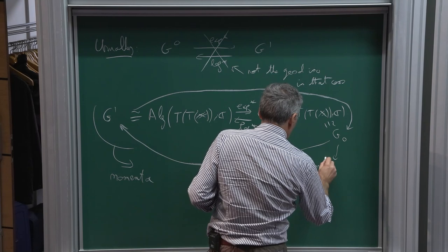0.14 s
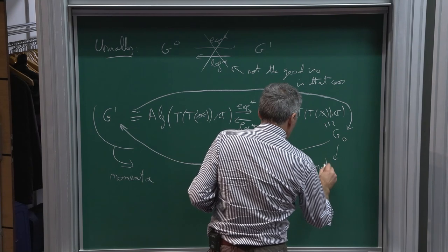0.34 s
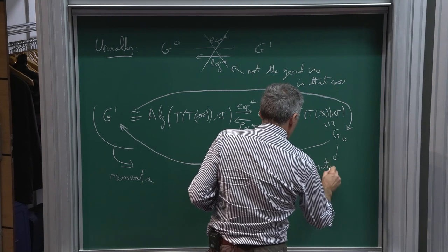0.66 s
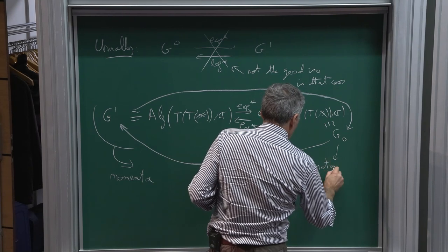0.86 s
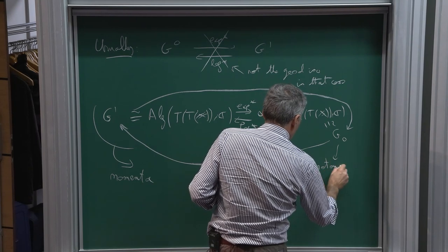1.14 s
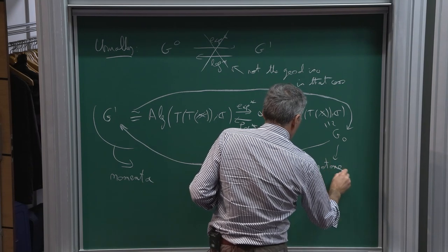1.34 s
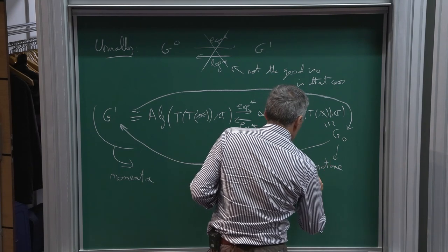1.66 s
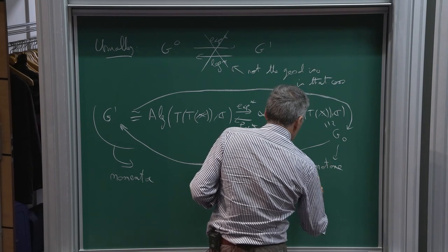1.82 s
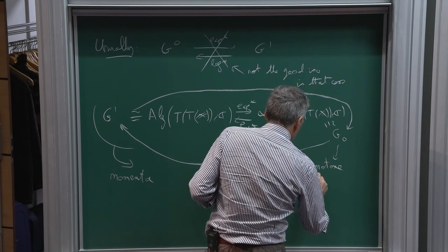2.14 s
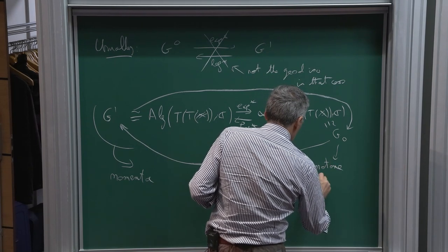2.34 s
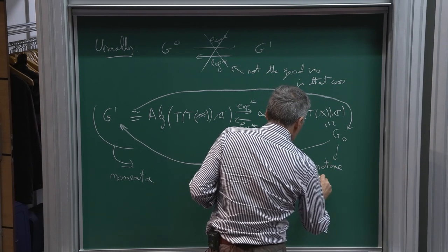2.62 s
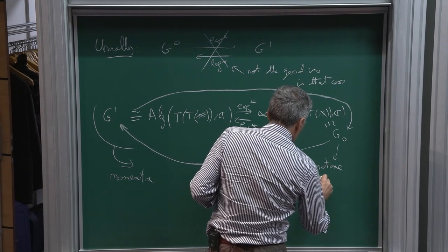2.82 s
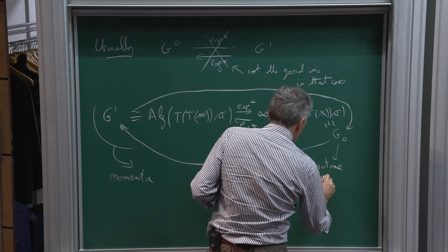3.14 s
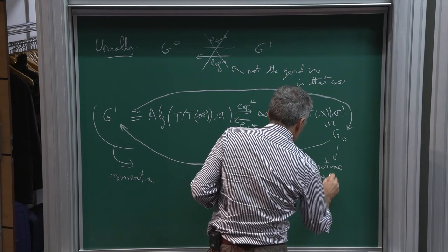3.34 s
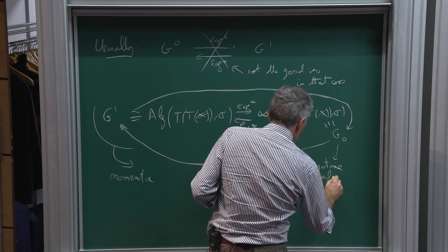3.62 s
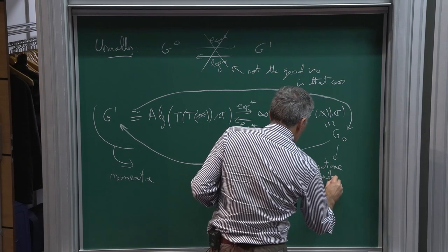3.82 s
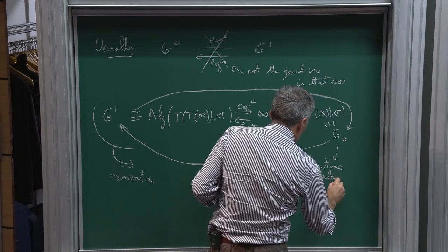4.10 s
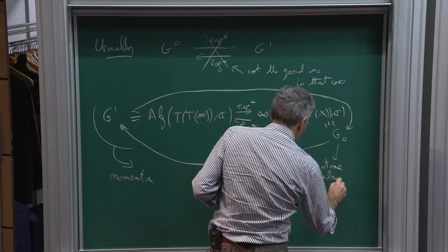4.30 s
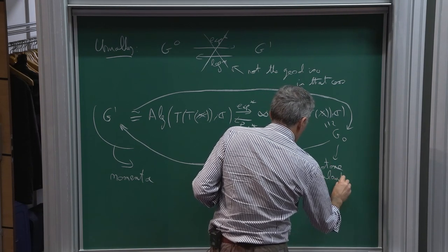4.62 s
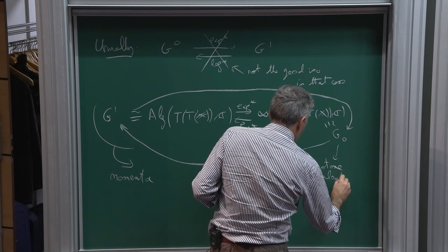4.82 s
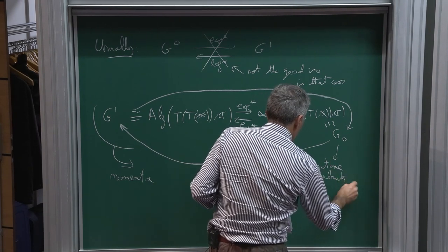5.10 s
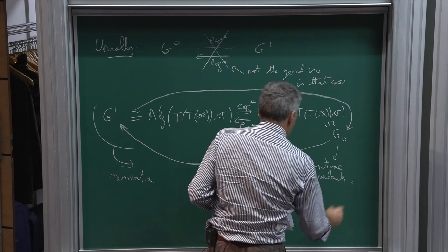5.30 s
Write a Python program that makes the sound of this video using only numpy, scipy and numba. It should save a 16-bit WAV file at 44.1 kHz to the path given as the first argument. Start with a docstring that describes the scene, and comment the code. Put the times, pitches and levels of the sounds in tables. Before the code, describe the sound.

Soft air hiss and low sleeve rustle run throughout, close to the microphone in a quiet room with a short, dark tail. Small chalk strokes begin at once, faint, gritty and bright, each about a twentieth to a quarter of a second. A clear tap at 0.25 s rings the board with a low sway, another follows at 0.66 s. A faint thin squeak rises at 0.53 s. Scratching continues, with a dull low knock near 1.04 s and a smaller one at 1.57 s, when the writing thins. A tap at 1.78 s starts a longer stroke; another lands at 2.5 s, then quick even strokes. Thin high streaks rise at 3.4 and 3.6 s, a tap at 3.75 s, muffled knocks at 4.1 to 4.3 s with a faint rising streak. More scratches lead to the two hardest, sharpest taps at 4.99 and 5.17 s, then one very faint dragging stroke.

```python
"""A stick of chalk writes small letters on a large sliding board, close to a clip-on microphone in a quiet room.
From the start the air hisses softly, a sleeve rustles as low noise and chalk strokes follow one another:
grit noise for the tip, ringing modes for stick and panel. Landings tick and ring the board, audible sway
joins from 0.25 s on; thin streaks rise at 0.53 s and from 3.4 to 4.2 s; dull decaying sines knock near 1, 1.6
and 4.1-4.3 s; the two hardest landings come at 4.99 and 5.17 s, before a last faint stroke."""
import sys
import numpy as np
from scipy import signal
from scipy.fft import rfft, irfft
from scipy.io import wavfile
from scipy.ndimage import uniform_filter1d
from numba import njit

SR = 44100
rng = np.random.default_rng(int(sys.argv[2]) if len(sys.argv) > 2 else 0)


def gain_from_db(level_db):
    """Turn a decibel level (scalar or array-like) into a linear amplitude factor."""
    decades = np.asarray(level_db, float) / 20
    return 10 ** decades


def persist_wave(psi):
    """Save psi, clipped to +-1, as 16-bit WAV."""
    counts = np.round(np.clip(psi, -1, 1) * 32767).astype(np.int16)
    wavfile.write(sys.argv[1], SR, np.atleast_2d(counts).T)


N = 240518
TIME = np.arange(N) / SR


def colour(x, points):
    """Filter by (f/Hz, level/dB) points; rms 1."""
    hz, db = np.transpose(points)
    f = np.maximum(np.arange(len(x) // 2 + 1) * SR / len(x), 1)
    gain_db = np.interp(np.log(f), np.log(hz), db)
    y = irfft(rfft(x) * gain_from_db(gain_db), len(x))
    return y / np.std(y)


def walk(rate_hz):
    """Random levels held 1 / rate_hz and slewed twice; spread near 1."""
    hold = int(SR / rate_hz)
    steps = np.repeat(rng.standard_normal(N // hold + 1), hold)
    slewed = uniform_filter1d(uniform_filter1d(steps, hold), hold)
    return 1.49 * slewed[:N]


def add(out, x, start_s):
    """Mix x into out from start_s."""
    i = int(start_s * SR)
    out[i:i + len(x)] += x[:N - i]


@njit
def svf(x, hz, width_hz):
    """State-variable band-pass whose centre moves, gain 1 at the centre."""
    y, band, low = np.empty(len(x)), 0., 0.
    for i in range(len(x)):
        g = np.tan(np.pi * hz[i] / SR)
        k = width_hz / hz[i]
        v = (band + g * (x[i] - low)) / (1 + g * (g + k))
        band, low, y[i] = 2 * v - band, low + 2 * g * v, k * v
    return y


def modes(table, count, spread):
    """Complex decays: each row splits into one mode per 70 Hz of its f, 1 to count, scattered around f."""
    crowd = np.clip(np.array(table)[:, 0] // 70, 1, count).astype(int)
    hz, db, t60_s = np.repeat(table, crowd, axis=0).T[:, :, None]
    crowd = np.repeat(crowd, crowd)[:, None]
    hz = hz * (1 + spread * (crowd > 1) * rng.uniform(-1.07, 1, hz.shape))
    t = TIME[:SR // 4]
    return gain_from_db(db) / np.sqrt(crowd) * np.exp(t * (2j * np.pi * hz - np.log(1000) / t60_s))


def struck(rings, spot_db, spot_turn_rad):
    """Unit-energy answer to a unit push; each spot weights and turns the modes its own way."""
    weight, turn = rng.standard_normal((len(rings), 2)).T
    spot = gain_from_db(spot_db * weight) * np.exp(1j * spot_turn_rad * turn)
    ring = -np.real(spot @ rings)
    return ring / np.sqrt(np.sum(ring ** 2))


# spectrum of the still air: [f/Hz, relative level/dB per Hz]
AIR_SPECTRUM = [(20, -9), (60, -3.5), (150, -6.5), (400, -20.5), (800, -22), (1500, -29), (3500, -29.5),
                (6500, -20.5), (10000, -41), (12800, -46), (13600, -63)]


def still_air():
    """Steady coloured noise of the room air."""
    air_rms_db = -63
    return gain_from_db(air_rms_db) * colour(rng.standard_normal(N), AIR_SPECTRUM)


# low rustle of the moving arm: [t/s, level/dB before flutter]
RUSTLE_LEVELS = [(0.0, -56.5), (0.14, -61.5), (0.39, -61.5), (0.85, -56.5), (1.26, -54), (1.53, -59.5),
                 (1.77, -67), (1.93, -55.5), (2.49, -61.5), (2.88, -60), (3.29, -67.5), (3.51, -53),
                 (3.61, -57.5), (4.04, -60), (4.78, -55), (5.01, -63.5), (5.16, -56), (5.45, -61.5)]
# soft knocks of hand or cloth: [t/s, level/dB, final f/Hz, t60/s]
SOFT_KNOCKS = [(1.04, -40, 107.5, 0.17), (1.568, -45, 201, 0.02), (4.07, -45.5, 116, 0.14),
               (4.146, -34.5, 136, 0.043), (4.322, -42.5, 370, 0.031)]


def arm():
    """Cloth rumble whose level flutters, and a few dull knocks that sag in pitch."""
    cloth_db, flutter_db, flutter_hz = -6, 2.28, 18
    s, db = np.transpose(RUSTLE_LEVELS)
    rumble = colour(rng.standard_normal(N), [(10, -6), (40, 1.5), (100, -1), (250, -2.5), (500, -27.0)])
    cloth = colour(rng.standard_normal(N), [(150, 4), (350, 3.5), (650, -3), (1200, -17)])
    level_db = np.interp(TIME, s, db) + flutter_db * walk(flutter_hz)
    out = gain_from_db(level_db) * (rumble + gain_from_db(cloth_db) * cloth)
    t = TIME[:SR // 5]
    sagging_s = t + 0.0025 * (1 - np.exp(-t / 0.0014))
    for s, db, hz, t60_s in SOFT_KNOCKS:
        knock = np.sin(2 * np.pi * hz * sagging_s) * np.exp(-np.log(1000) * t / t60_s)
        add(out, -gain_from_db(db) * knock, s)
    return out


def room(x):
    """Diffuse tail that builds within 2 ms and loses its treble first."""
    dark_t60_s, treble_t60_s, tail_db = 0.29, 0.1, -6
    t = TIME[:SR // 2]
    dark = colour(rng.standard_normal(len(t)), [(100, -19.0), (300, 4.5), (2000, -10.5), (4000, -9.0)])
    tail = dark * np.exp(-np.log(1000) * t / dark_t60_s)
    tail = tail + 3.18 * rng.standard_normal(len(t)) * np.exp(-np.log(1000) * t / treble_t60_s)
    tail = tail * (1 - np.exp(-t / 0.00043))
    return gain_from_db(tail_db) * signal.fftconvolve(x, tail / np.sqrt(np.sum(tail ** 2)))[:N]


# thin rising streaks where the tip chatters: [t/s, length/s, from f/Hz, to f/Hz, level/dB before swell]
CHATTER_STREAKS = [(0.528, 0.029, 2720, 2900, -60), (3.41, 0.05, 6800, 7600, -55),
                   (3.626, 0.041, 6260, 6900, -53), (4.166, 0.081, 3070, 4000, -60)]


def streaks():
    """Noise through a narrow gliding band-pass, one soft swell each."""
    out = np.zeros(N)
    for s, length_s, from_hz, to_hz, db in CHATTER_STREAKS:
        noise = rng.standard_normal(SR // 5)[:int(length_s * SR)]
        glide_hz = np.linspace(from_hz, to_hz, len(noise))
        line = svf(svf(noise, glide_hz, 300.), glide_hz, 300.)
        add(out, gain_from_db(db) * np.hanning(len(line)) * line / np.std(line), s)
    return out


# ringing of the board: [f/Hz around which modes scatter, relative level/dB, t60/s]
BOARD_MODES = [(165, -11.5, 0.22), (198, -8, 0.13), (237.5, -2, 0.041), (331, -27.5, 0.13),
               (456.5, -15.5, 0.097), (578, -6, 0.084), (759, 0, 0.032), (844, -3, 0.036),
               (999, 0.5, 0.068), (1098, -26, 0.13), (1273, -4, 0.026), (1251, -6.5, 0.12),
               (1474, 2, 0.037), (1558, -3.5, 0.03), (1813, 4, 0.015), (1947, -18, 0.015),
               (2059, -2.5, 0.053), (2415, -9.5, 0.082), (2400, -3, 0.056), (2632, -5, 0.084),
               (2900, -2.5, 0.049), (3182, 0, 0.019), (3640, -8, 0.074), (4140, -6, 0.026),
               (4890, -12, 0.15), (4940, -12, 0.016), (5660, -16, 0.065), (5540, 5, 0.034),
               (6590, -1.5, 0.088), (6890, -10.5, 0.061), (7900, 7, .035), (8450, -33, 0.027)]


def board():
    """Panel resonances as clusters of decaying modes."""
    return modes(BOARD_MODES, count=12, spread=0.078)


# colour of the breaking grit: [f/Hz, relative level/dB per Hz]
GRIT_SPECTRUM = [(1500, -4), (3000, -10), (4000, -6), (5200, 1), (7300, 3), (9000, 0), (11000, -5.5),
                 (13000, -11), (16000, -23.5)]


def grit_colour(x):
    """Spectrum of chalk grit breaking; rms 1."""
    return colour(x, GRIT_SPECTRUM)


# landings: [t/s, blow level/dB, tick level/dB over blow, contact/ms (push peaks at a quarter of it),
# f/Hz that this spot of the board favours]
LANDINGS = [(0.226, -75, 27, 0.13, 5500), (0.2494, -27, -2.5, 0.15, 1070), (0.371, -52.5, 6, 0.54, 970),
            (0.395, -56.5, 15.5, 0.069, 1500), (0.466, -61, 15, 0.65, 2510), (0.471, -47.5, -9, 0.77, 845),
            (0.6638, -28.5, -12, 0.066, 1370), (1.7774, -29.5, -15, 0.42, 1400),
            (2.498, -33, 5, 0.26, 1530), (3.751, -27.5, -22, 0.27, 1340), (3.983, -63, 0, 0.17, 1000),
            (4.147, -51.5, -10, 0.13, 400), (4.7143, -59, 4, 0.42, 2020), (4.993, -23.5, -3.5, 0.15, 1390),
            (5.1698, -20, 1, 0.12, 1760)]


def taps(panel):
    """A short push rings the modes, the chalk end crunches, and a slowing bend wave sways the panel."""
    # sway of the softest landings is too faint to hear and is left out; it grows slower than the blow
    faint_blow_db, sway_base_db, sway_db_per_db = -40, -43, 0.646
    first_give_db = 6.5  # over the blow: the surface first gives way in one inward pulse
    near, sway = np.zeros(N), np.zeros(N)
    t = TIME[:SR // 5]
    bend = np.sin(4.66 * np.log(1 + t / 0.013)) * (1 - np.exp(-t / 0.0051)) * np.exp(-t / 0.042)
    crunch = (1 - np.exp(-t / 0.00066)) * (np.exp(-t / 0.0016) + 0.33 * np.exp(-t / 0.0055))
    for s, blow_db, tick_db, contact_ms, spot_hz in LANDINGS:
        # softer contact lasts longer and dulls the ring
        push = t[:200] * np.exp(-t[:200] / (contact_ms / 1000 / 4))
        ring = signal.fftconvolve(struck(panel, spot_db=2.0, spot_turn_rad=2.87), push / push.sum())
        ring = ring + gain_from_db(4.5) * svf(ring, np.full(len(ring), 1. * spot_hz), 230.0)
        ring = ring / np.sqrt(np.mean(ring[:SR // 100] ** 2))
        crack = grit_colour(rng.standard_normal(len(t))) * crunch
        add(near, gain_from_db(blow_db) * ring, s)
        add(near, -gain_from_db(blow_db + first_give_db) * push / push.max(), s)
        add(near, gain_from_db(blow_db + tick_db) * crack, s)
        if blow_db > faint_blow_db:
            sway_db = sway_base_db + sway_db_per_db * (blow_db - faint_blow_db)
            add(sway, gain_from_db(sway_db) * bend / np.max(np.abs(bend)), s)
    return near, sway


def rubbing(density_hz, spread_db):
    """Smooth rubbing noise with sparse harder particles in it; rms 1."""
    hard = (rng.random(N) < density_hz / SR) * gain_from_db(spread_db * rng.exponential(size=N))
    rub = rng.standard_normal(N) * (1 + hard)
    return rub / np.std(rub)


# ringing of the chalk stick: [f/Hz around which modes scatter, relative level/dB, t60/s]
STICK_MODES = [(4106, 4, 0.034), (4970, -1.5, 0.075), (5200, 3, 0.018), (5600, -21, 0.011),
               (6346, -10.5, 0.054), (7430, -2.5, 0.0068), (7850, -18.5, 0.055), (8730, -8, 0.037),
               (9190, -12, 0.026), (10720, 5, 0.023), (11260, 1.5, 0.015), (12600, -6, 0.023),
               (14300, 2, 0.022), (15300, 3, .025)]
# how the hand holds the chalk: [t/s, ring of the free end f/Hz at rest,
# centre of the drag f/Hz (lower under a heavy hand), tip sharpness as hiss level/dB above 10 kHz]
HAND_GRIP = [(0.0, 7660, 1100, 3.5), (0.7, 7900, 1250, 7), (0.9, 4870, 980, 6), (1.05, 5400, 1090, 7.5),
             (1.16, 10000, 1330, 6), (1.28, 7950, 1490, 6), (1.5, 7900, 754, 4), (1.85, 5200, 900, 7),
             (1.96, 5200, 1680, 8), (2.3, 5600, 790, 5), (2.65, 8700, 1210, 6), (3.14, 8850, 1520, 7),
             (3.24, 6260, 1590, 5), (3.39, 7100, 1790, 8), (3.46, 7300, 970, 6), (3.63, 6760, 1570, 5),
             (3.85, 7060, 1490, 3), (4.2, 5700, 1420, 7.5), (4.25, 8500, 860, 5), (4.34, 8000, 840, 6),
             (4.45, 7350, 1370, 8), (4.64, 5340, 1360, 5), (4.8, 7200, 1580, 0), (5.05, 7460, 1180, 5),
             (5.45, 5800, 806, -8)]
# [t/s, nominal length/s, relative tip hiss level/dB, board drag level/dB (rms about 3 dB lower),
# share of the stroke at top speed/0-1]
CHALK_STROKES = [(-0.03, 0.051, -53.5, -59, 0), (0.108, 0.022, -55, -61, 0.4),
                 (0.208, 0.041, -55.5, -92, 0.7), (0.269, 0.097, -48, -59, 0.4),
                 (0.364, 0.035, -55.5, -80, 0.3), (0.409, 0.024, -55, -56, 0.1),
                 (0.472, 0.056, -54, -61, 0.13), (0.525, 0.041, -46, -49.5, 0.9),
                 (0.596, 0.03, -62, -79, 0.9), (0.675, 0.15, -53.5, -62, 0.1),
                 (0.797, 0.17, -55, -59, 0.65), (0.999, 0.066, -55, -58, 0.72),
                 (1.093, 0.13, -48.5, -56, 0.77), (1.22, 0.15, -50.5, -58, 0.15),
                 (1.341, 0.064, -48.5, -48.5, 1), (1.474, 0.027, -58, -62, 0.7),
                 (1.512, 0.093, -62.5, -68.5, 0), (1.597, 0.13, -63, -81, 0),
                 (1.78, 0.27, -49.5, -56, 0.56), (2.059, 0.14, -54, -67, 0.24),
                 (2.159, 0.095, -54, -58, 0.78), (2.257, 0.16, -57.5, -68, 0.22),
                 (2.424, 0.044, -63, -68, 0.6), (2.504, 0.084, -51.5, -68, 0.1),
                 (2.602, 0.09, -53, -56, 0.6), (2.703, 0.096, -55, -72, 0.52),
                 (2.814, 0.095, -53.5, -57.5, 0.34), (2.894, 0.095, -55, -64.5, 0.7),
                 (3.001, 0.083, -51.5, -55.5, 0.9), (3.089, 0.098, -54, -65.5, 0.9),
                 (3.201, 0.081, -54.5, -57.5, 0.4), (3.302, 0.12, -51.5, -56, 0.92),
                 (3.415, 0.12, -50, -51.5, 0.4), (3.531, 0.085, -50.5, -65.5, 0.44),
                 (3.608, 0.053, -48, -55, 0.9), (3.705, 0.07, -63, -78, 0.51),
                 (3.766, 0.16, -53, -58, 0.35), (3.902, 0.062, -55.5, -58.5, 0.8),
                 (3.988, 0.083, -53.5, -61, 0.6), (4.073, 0.076, -60.5, -61, 0.46),
                 (4.155, 0.072, -54.5, -57.5, 0.95), (4.219, 0.14, -58, -54.5, 0.57),
                 (4.359, 0.17, -52, -59, 0.4), (4.498, 0.066, -53, -53.5, 0.63),
                 (4.574, 0.12, -54, -62, 0.58), (4.709, 0.052, -55, -67, 0.9),
                 (4.766, 0.12, -53.5, -61, 0.17), (5.009, 0.065, -51.5, -48, 0.2), (5.2, 0.12, -76, -63, 0),
                 (5.255, 0.33, -60, -66.5, 0.3)]


def writing(panel):
    """Each stroke speeds up and slows; the tip hisses, the stick sings and the drag hums in the panel."""
    stick = modes(STICK_MODES, count=12, spread=0.075)
    rub = rubbing(density_hz=1500., spread_db=2.5)
    tip = grit_colour(rub * gain_from_db(1.57 * walk(60)))
    # uneven stick and slip pushes the panel
    push = colour(rub * gain_from_db(1.34 * walk(45)),
                  [(150, -37), (500, 18.0), (1000, 2.5), (2500, 12.5), (4000, 8), (8000, -36)])
    at, *columns = np.transpose(HAND_GRIP)
    ring_hz, centre_hz, sharpness_db = (np.interp(TIME, at, c) for c in columns)
    pressure_db = 1.5 * walk(14)  # the hand never presses evenly
    edge = signal.sosfilt(signal.butter(2, 10000, "high", fs=SR, output="sos"), tip)
    tip = tip + (gain_from_db(sharpness_db) - 1) * edge
    drag_band = svf(svf(push, centre_hz, 1660.0), centre_hz, 1660.0)
    push = gain_from_db(pressure_db) * (push + gain_from_db(9.5) * drag_band)
    out = np.zeros(N)
    for s, length_s, hiss_db, drag_db, top in CHALK_STROKES:
        near = slice(max(int((s - .004) * SR), 0), int((s + length_s + 0.00059) * SR))
        start_s = TIME[near][0]
        u = np.clip((TIME[near] - s + 0.0014) / (length_s + 0.0053), 0, 1)
        top = np.clip(top, .05, .95)
        speed = np.sin(np.pi / 2 * np.where(u < top, u / top, (1 - u) / (1 - top)))
        end_hz = np.mean(ring_hz[near]) * (1 + 0.0082 * speed)  # higher when pushed fast
        hiss = tip[near] + gain_from_db(-5) * svf(tip[near], end_hz, 770.0)
        hiss = gain_from_db(hiss_db) * speed ** 0.63 * hiss
        hum = signal.fftconvolve(speed ** 0.7 * push[near], struck(panel, spot_db=1.0, spot_turn_rad=2.47))
        hum[:len(u)] += gain_from_db(-2) * speed ** 0.28 * push[near]  # the contact patch also sounds by itself
        singing = signal.fftconvolve(hiss, struck(stick, spot_db=-6.0, spot_turn_rad=3.03))
        add(out, gain_from_db(-2.0) * hiss, start_s)
        add(out, gain_from_db(-9) * singing, start_s)
        add(out, gain_from_db(drag_db) * hum * np.sqrt(len(u) / np.sum(hum ** 2) / 2), start_s)
    return out


def scene():
    """Chalk and board with their room, the sway, the arm, and the still air."""
    panel = board()
    near, sway = taps(panel)
    chalk = near + writing(panel) + streaks()
    return (chalk + room(chalk) + sway + arm() + still_air())[None, :]


def top_cut(x):
    """Nothing passes above the cut-off."""
    return signal.sosfilt(signal.butter(12, 16790, fs=SR, output="sos"), x)


def record(dry):
    """The microphone chain ends in a steep low-pass near the top of hearing."""
    top_hz, ripple_db, stop_db = 16200, .2, 70
    low_pass = signal.ellip(8, ripple_db, stop_db, top_hz, fs=SR, output="sos")
    mix = signal.sosfilt(low_pass, dry)
    return top_cut(mix)


dry = scene()
out = record(dry)
persist_wave(out)
```